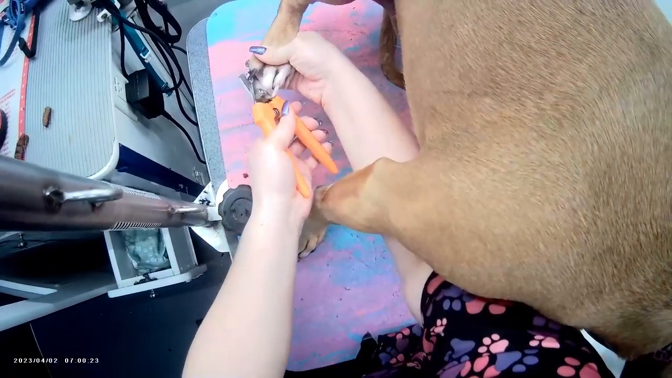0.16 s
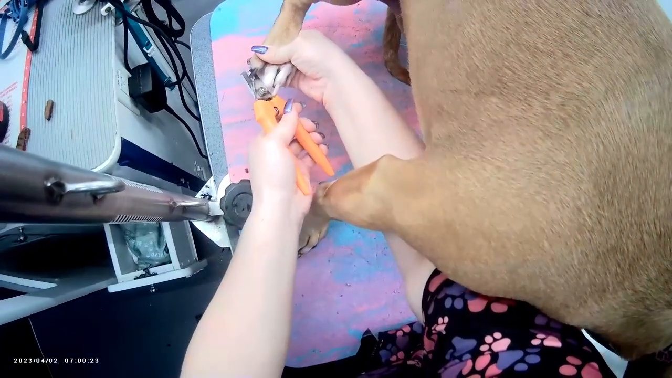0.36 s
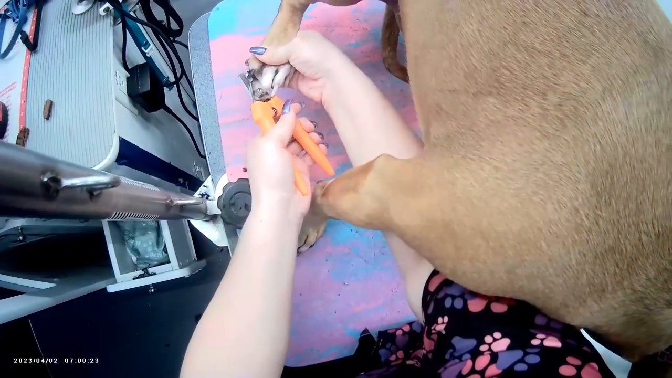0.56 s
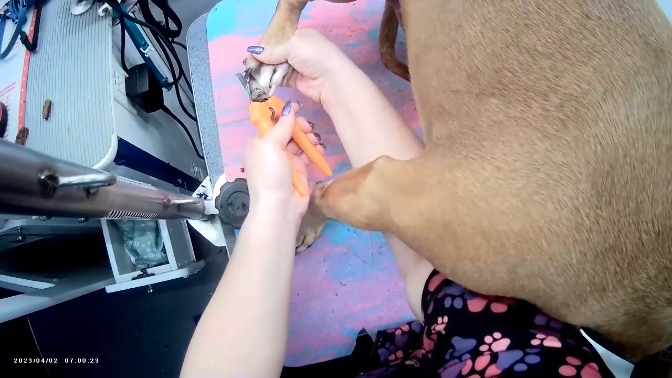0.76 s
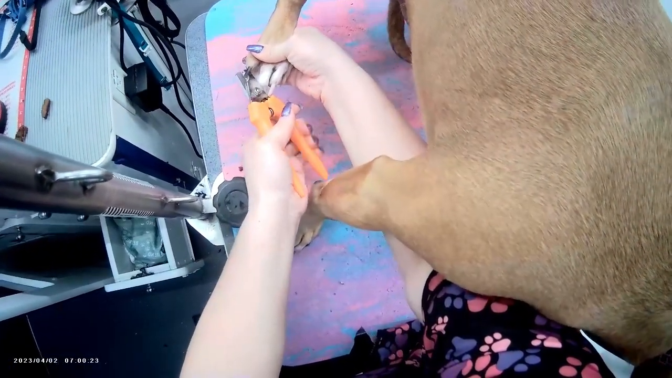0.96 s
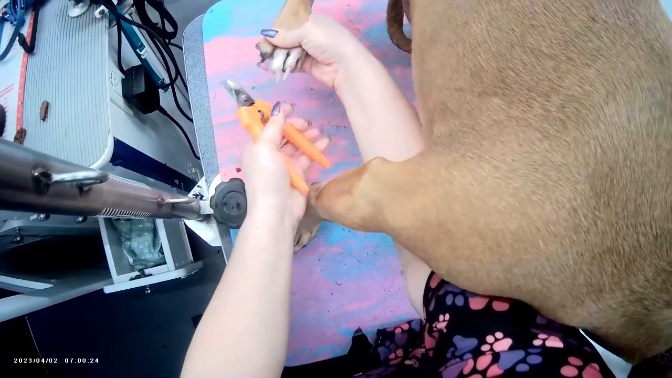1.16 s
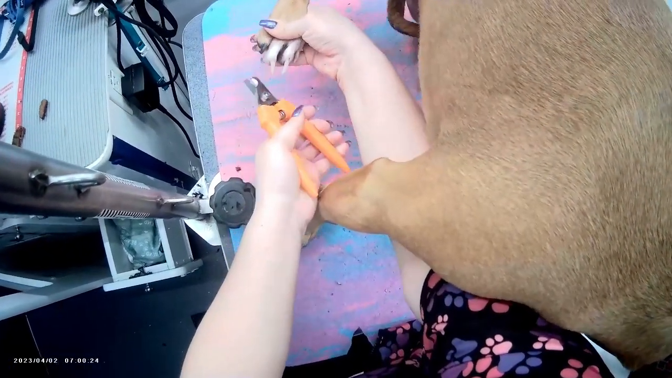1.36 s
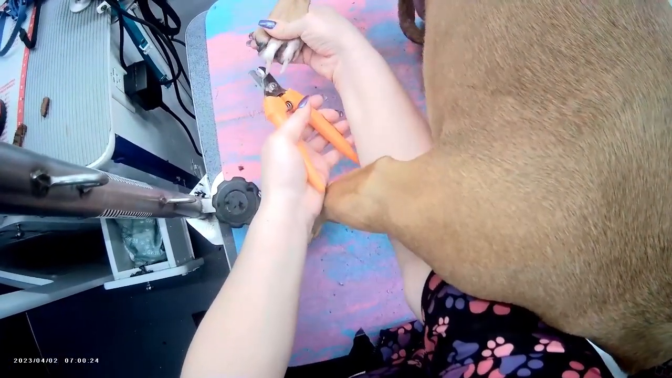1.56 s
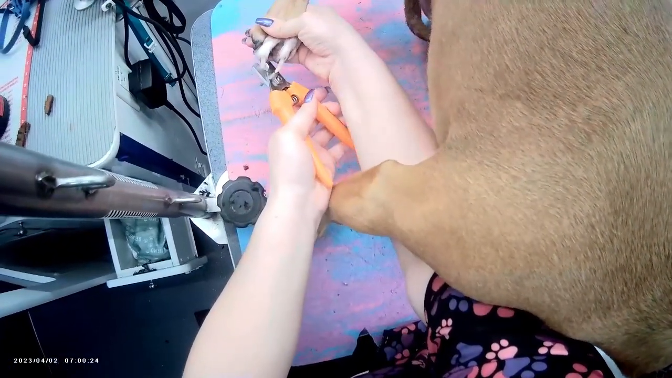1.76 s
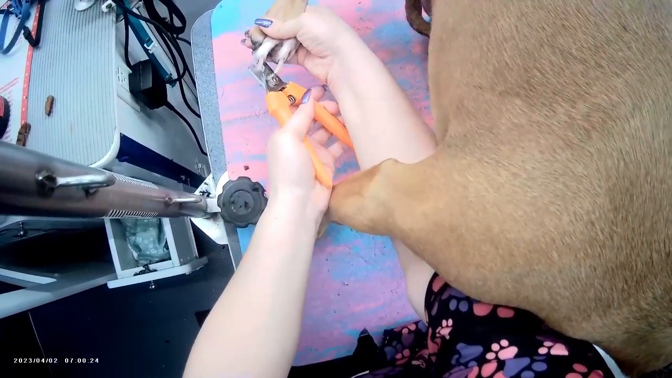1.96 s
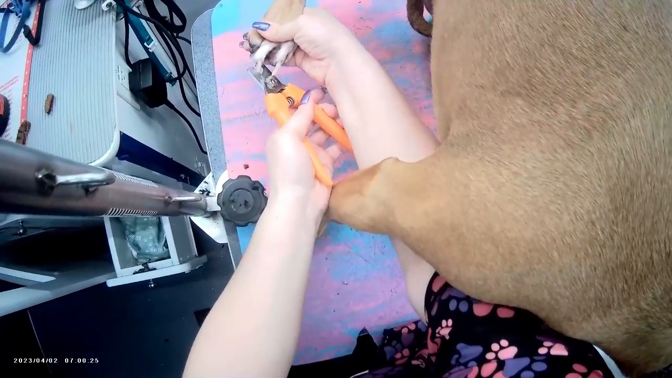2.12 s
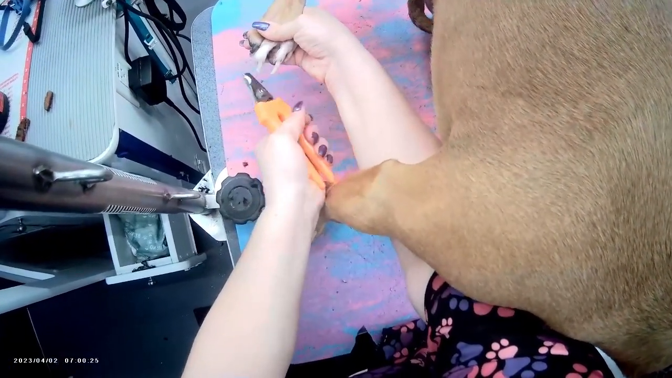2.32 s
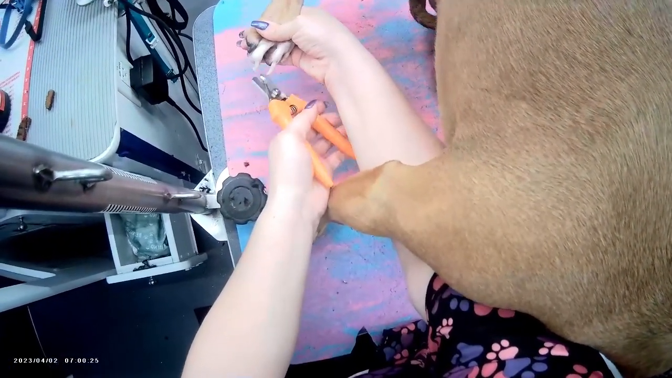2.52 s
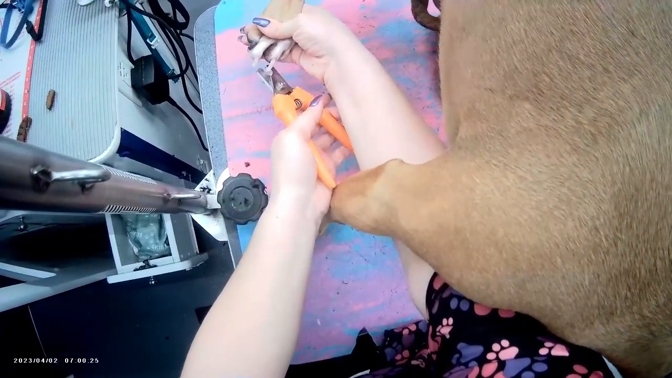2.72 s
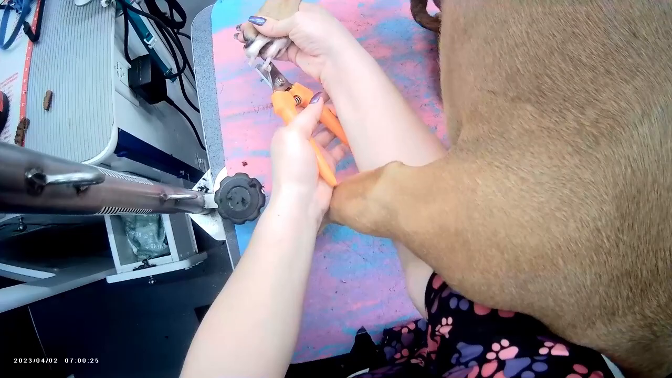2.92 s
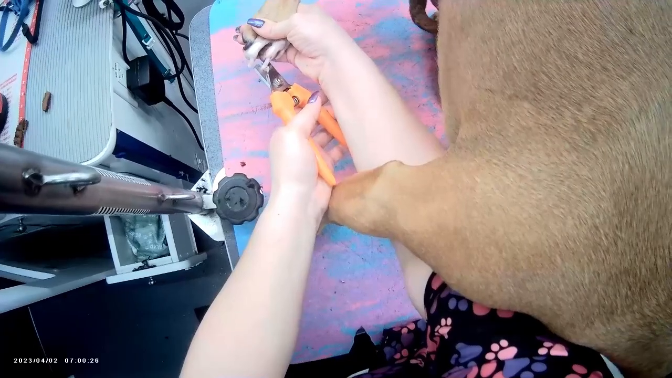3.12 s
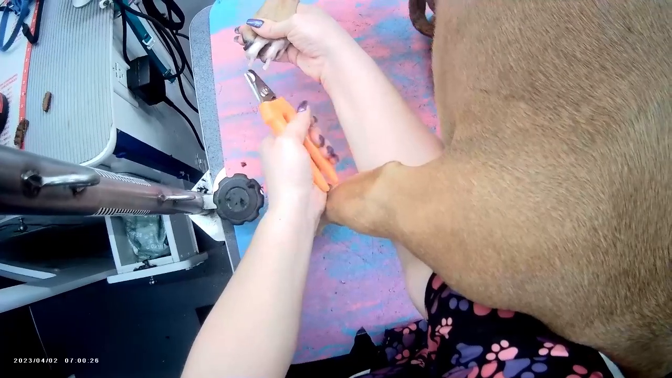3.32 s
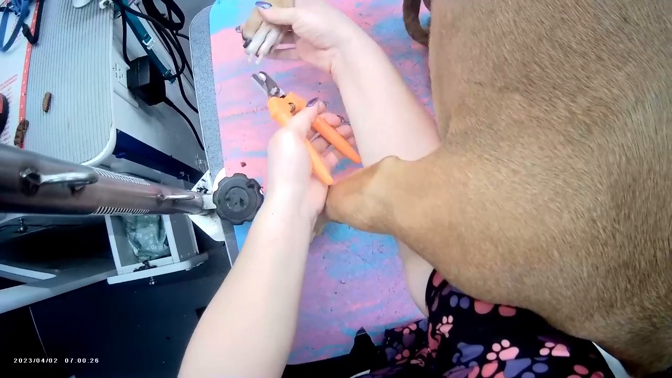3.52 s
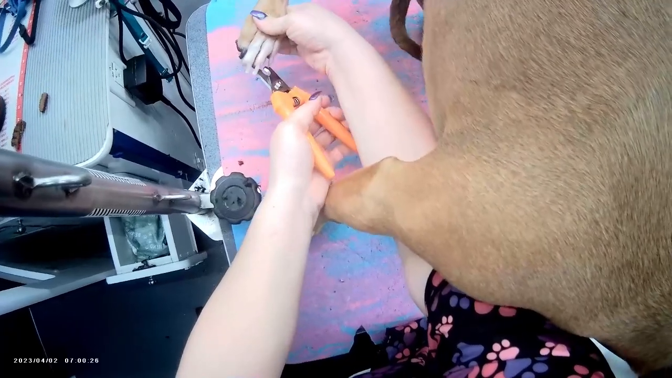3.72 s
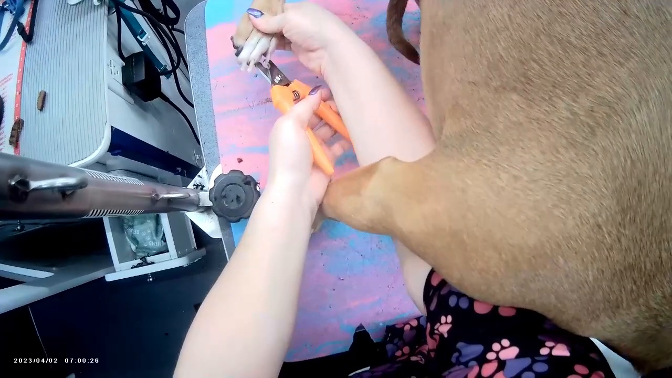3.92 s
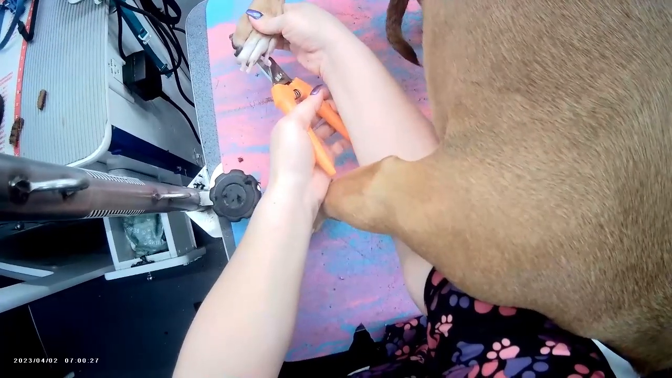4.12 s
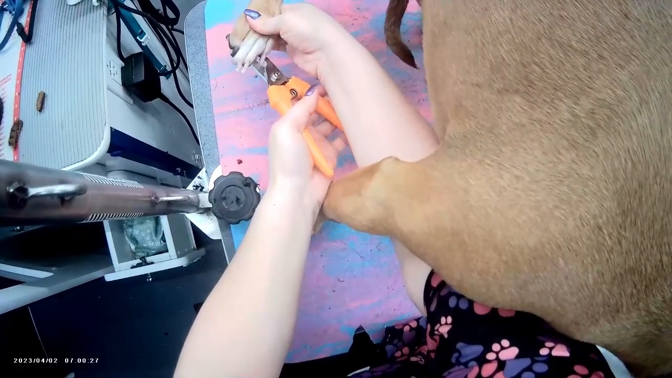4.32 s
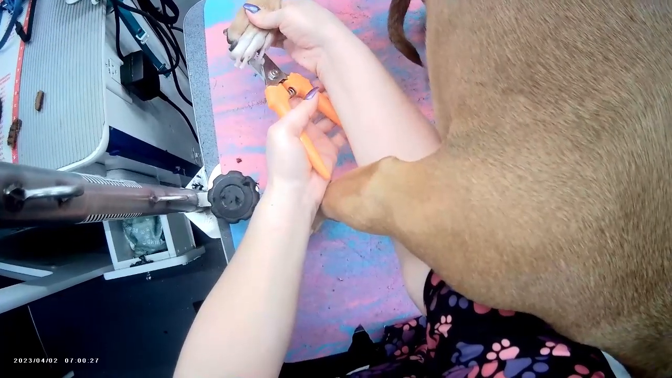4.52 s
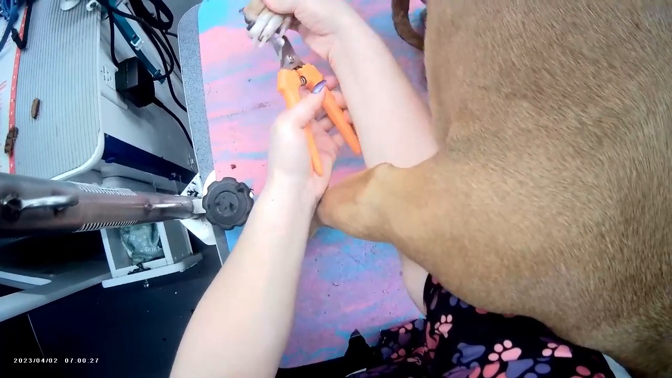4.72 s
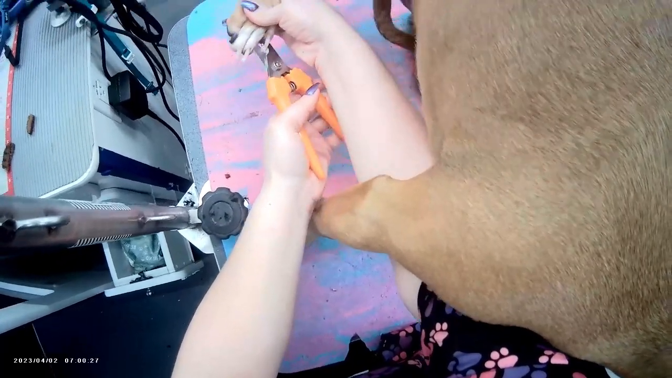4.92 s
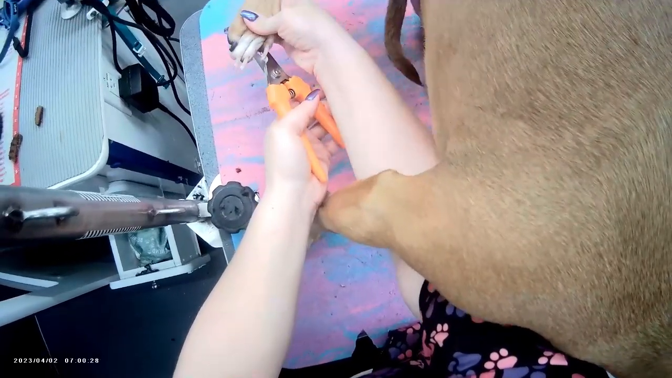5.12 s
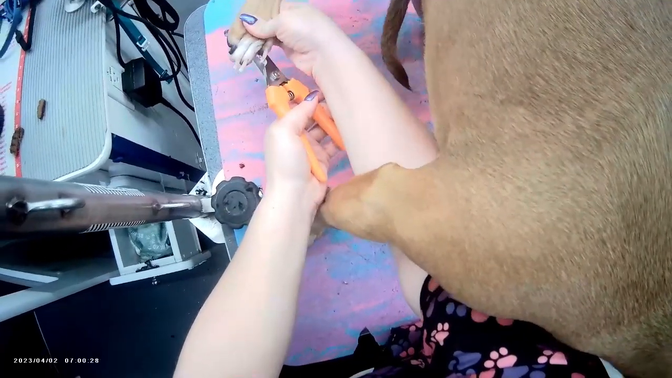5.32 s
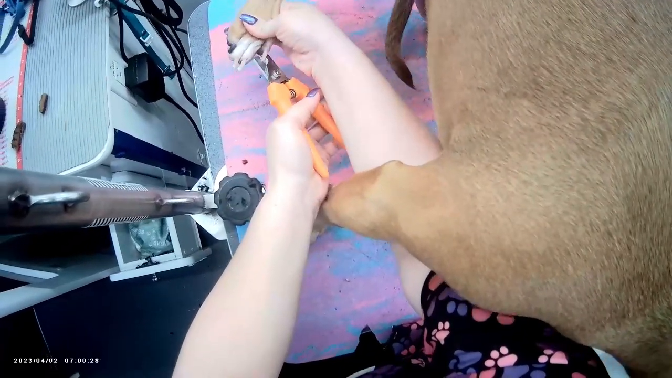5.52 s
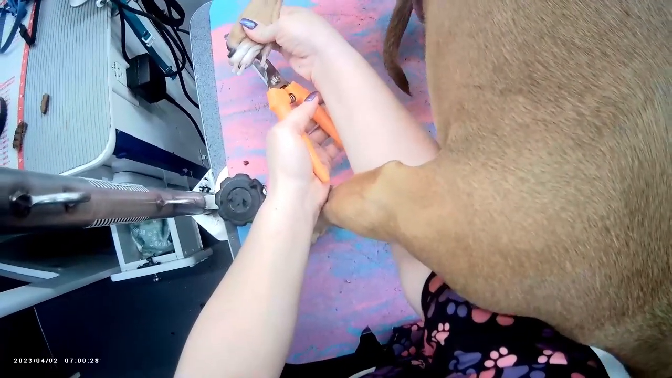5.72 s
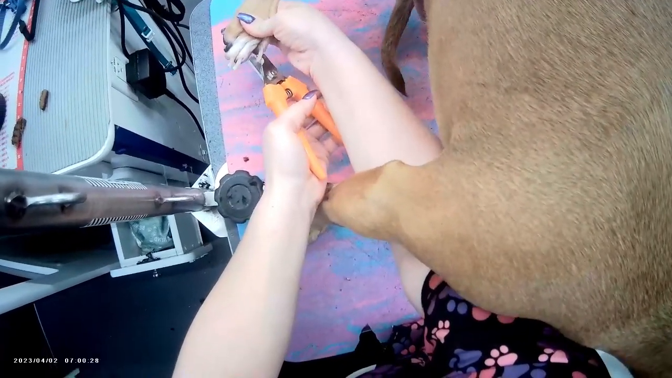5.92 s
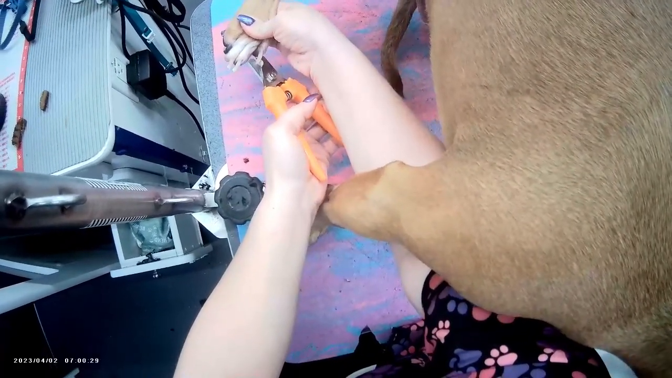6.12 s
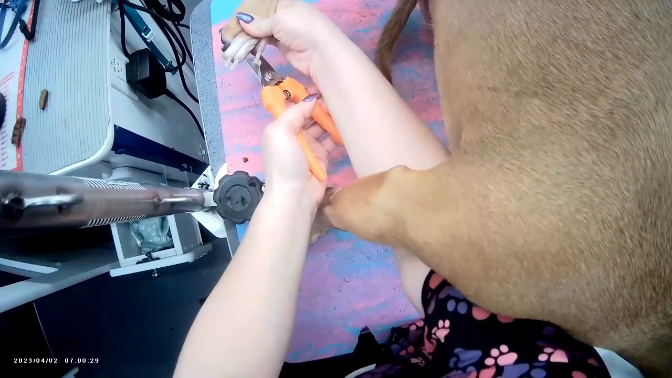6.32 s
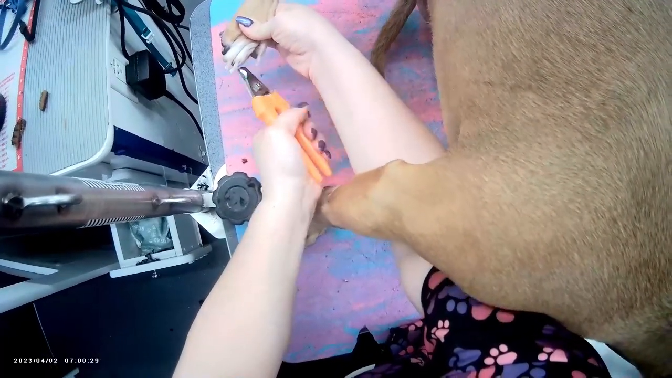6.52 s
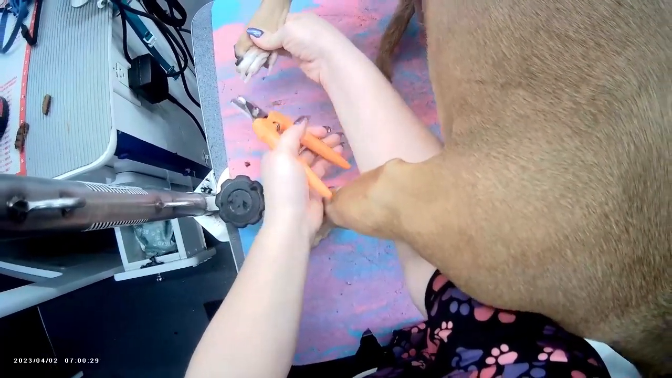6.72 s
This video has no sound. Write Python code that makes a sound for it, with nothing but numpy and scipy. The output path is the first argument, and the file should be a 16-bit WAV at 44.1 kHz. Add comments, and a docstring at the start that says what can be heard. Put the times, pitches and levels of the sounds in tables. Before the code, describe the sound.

Close, crackling snips of steel clippers on thick dog nails, each a snap with a tearing edge and an instant clack of jaws and plastic handles. Three cuts come in the first half and one near the end. Underneath runs an unbroken, boomy fan whir with a wavering hum, joined midway by a swelling low drone. The close microphone sounds narrow, with muffled highs and a short indoor tail.

```python
"""Fans rush and hum throughout: noise through hollow resonances, plus slightly wavering sines.
Scissor-style clippers then cut a dog's toenails four times, at about 1.0, 2.3, 3.3 and 6.6 s, close by
in a dry room. Creaks of the blades precede all but the first cut. Each cut is a splinter, a snap, a tear
and, some 6 ms after the snap, a clack of the jaws: dispersed impulses that ring steel, horn and handles.
Between the third and fourth cuts one low drone swells, then holds."""
import sys
import numpy as np
from scipy import signal
from scipy.fft import rfft, irfft, next_fast_len
from scipy.io import wavfile
from scipy.ndimage import uniform_filter1d, minimum_filter1d, map_coordinates

SR = 44100
rng = np.random.default_rng(int(sys.argv[2]) if len(sys.argv) > 2 else 0)


def transcribe(u):
    """Save the signal u as a 16-bit wav file named by the first command-line argument.

    u: samples, shape (n,) or (channels, n), limited to [-1, 1]; the rate is SR.
    q: integer samples, one column per channel.
    """
    v = np.clip(np.atleast_2d(u).T, -1, 1)
    q = np.round(v * 32767).astype(np.int16)
    wavfile.write(sys.argv[1], SR, q)


N = 302646
T = np.arange(N) / SR
SPAN = SR // 4  # samples in one short event

# Spectrum of the fan rush. Each row: frequency in Hz, gain in dB.
AIR_COLOUR = [(20, -1), (80, 0), (130, -1), (205, -12), (280, -10), (400, -12.5), (500, -14), (750, -16.5),
              (1300, -24.2), (1650, -29.5), (2250, -28.5), (2800, -32), (4000, -32), (5000, -36.5),
              (6500, -40), (9000, -41.5)]
# Hollows of the fan housings and the room. Each row: frequency in Hz, width in Hz, gain over the rush in dB.
HOUSING_MODES = [(138, 5, 9.5), (178, 9, 13.5), (261, 19, 13.0), (295, 8, 14.0), (337, 8, 10.5),
                 (377, 21, 10.5), (408, 20, 8.5), (472, 8, 5.5), (591, 57, -0.5), (664, 16, 5.0),
                 (801, 15, 3.5), (925, 9, 3.0), (972, 25, 6.5), (1109, 13, 9.0), (1197, 9, 11.0),
                 (1232, 19, 11.0), (1321, 15, 9.0), (1389, 41, 9.0), (1509, 34, 4.0), (1651, 39, 9.0),
                 (1746, 24, 8.5), (1855, 33, 5.5), (2000, 73, 4.5), (2150, 27, 4.5)]
AIR_DB = -26
FAN_HZ, BLOWER_HZ, MOTOR_HZ, MAINS_HZ = 24.205, 24.94, 58.3, 60.165
# Hum sources. Each row: base rate in Hz, list of (multiple of that rate, rms level in dB).
ROTORS = [(FAN_HZ, [(1, -62), (2, -27.5), (3, -38.5), (4, -46), (6, -42.5), (7, -51), (8, -41), (9, -44)]),
          (BLOWER_HZ, [(1, -20), (3, -45), (6, -40.5)]), (MOTOR_HZ, [(1, -31), (2, -33)]),
          (MAINS_HZ, [(2, -33), (4, -45)])]
DRONE_HZ, DRONE_DB, SWELL_DB, SWELL_START_S, SWELL_S = 92.46, -37, 11, 3.62, 1.96

# Reflections off near surfaces, table and arms. Each row: delay in seconds, level in dB.
ECHOES = [(.0012, -36), (.0041, -16.5), (.0074, -14.5), (0.017, -38)]
# Spectrum of the diffuse tail. Each row: frequency in Hz, gain in dB.
ROOM_COLOUR = [(200, -20), (700, 3), (1500, -1), (2200, -7.5), (2800, 0), (3700, 1), (4600, -1.5),
               (6300, -0.5), (7100, -0.5), (9000, 1.5)]
ROOM_DB, ROOM_T60_S = -6.5, 0.19

# Steel of the clippers, damped by the hand. Each row: frequency in Hz, level in dB, t60 in seconds.
CLIPPER_MODES = [(1940, -37, 0.14), (2440, -37, 0.066), (2720, -35.5, 0.033), (3400, -37.5, 0.04),
                 (3710, -38.5, 0.035), (3980, -30, .025), (4440, -39, .03), (4730, -35, 0.025),
                 (4900, -35, 0.025), (5330, -35, 0.025), (5450, -35.5, .025), (6500, -34.5, .025),
                 (6500, -25.5, 0.023), (6900, -33, .03), (7830, -31, .025)]
# Plastic handles. Each row: frequency in Hz, level in dB, t60 in seconds.
HANDLE_MODES = [(560, -3.5, 0.0043), (710, -20.5, 0.0033), (920, -14.5, 0.0095)]
# Spectrum of the directly heard crack. Each row: frequency in Hz, gain in dB.
CRACK_COLOUR = [(200, 13), (700, -4.5), (1400, -4.5), (2050, 5), (3050, -1), (3700, 3.5), (4300, 2),
                (4850, 3), (6500, 2.5), (8000, 1.5), (12000, -15.5)]
# Blades sticking and slipping as the grip tightens. Each row: start in seconds, relative level in dB,
# bite from 0 (skid) to 1 (tick).
SLIPS = [(2.231, -18.5, 0.2), (2.258, -9.5, 0.7), (3.221, -22, 0.6), (3.2255, -14.5, .1), (3.237, -15, 0.8),
         (3.2507, -12, 1), (3.2625, -20, 0.8), (6.5183, -17, 0.05)]
# Broad tick of a biting blade. Each row: frequency in Hz, width in Hz.
BITE_BANDS = [(3750, 2000), (6200, 1600)]
SKID_HZ, SKID_WIDTH_HZ = 4930, 620
SLIP_ROOM_DB, SLIP_WALL_S = 4, 0.003
# Cuts. Each row: snap time in seconds, snap level in dB, snap decay in seconds, snap high-pass in Hz,
# nail pitch in Hz, nail ring in dB, splinter lead in seconds, splinter level in dB, tear level in dB,
# tear pitch in Hz, tear ring in dB, jaw delay in seconds, clack level in dB, handle knock in dB,
# gain of the body band in dB, extra room in dB. Levels are relative.
SNIPS = [(1.0292, 3.5, 0.00039, 350, 2320, -8.5, .0012, -20, -5.5, 4100, -14, .0059, -4, -7.5, 2, 1),
         (2.2944, -5.5, 0.0022, 900, 3800, -3.5, 0.00119, -9, -0.5, 5000, -10, .0064, -4, -8, -1.5, 1.5),
         (3.2759, 3.5, 0.00049, 496, 3420, -3.5, 0.0027, -23, -0.5, 3480, -8, .006, -4.5, -11, 3, 1),
         (6.5589, 1, 0.00025, 300, 3540, -7, .0025, -5, 0.5, 3730, -6, .0062, -7, -9.5, -2.5, 1)]
SNIP_DB = 3.5
SPLINTER_DECAY_S, SPLINTER_HIGHPASS_HZ = 0.00055, 2500
TEAR_AFTER_S, TEAR_DECAY_S, TEAR_HIGHPASS_HZ = 0.0032, 0.00057, 2080
CLACK_DECAY_S, CLACK_HIGHPASS_HZ = 0.00046, 750
NAIL_WIDTH_HZ, NAIL_ROOM_DB = 320, -12
BODY_HZ, BODY_WIDTH_HZ = 2150, 1100

# Treble roll-off of the recorder. Each row: frequency in Hz, gain in dB.
RECORDER_COLOUR = [(6000, -0.5), (7000, -2), (7600, -8), (8200, -14.5), (8700, -26.5), (9200, -44.5),
                   (10000, -67)]
CUTOFF_HZ = 15700


def from_db(db):
    """Decibels to amplitude ratio."""
    return 10 ** (np.asarray(db) / 20)


def rms_one(x):
    """Scale to rms 1."""
    return x / np.sqrt(np.mean(x ** 2) + 1e-20)


def add(track, start_s, sound):
    """Mix a sound into a track in place."""
    part = track[round(start_s * SR):][:len(sound)]
    part += sound[:len(part)]


def colour(x, points):
    """Causal minimum-phase filter that follows a (Hz, dB) curve."""
    size = 2 * next_fast_len(len(x))
    hz, db = np.transpose(points)
    bins_hz = np.maximum(np.fft.rfftfreq(size, 1 / SR), 1)
    gain_db = np.interp(np.log(bins_hz), np.log(hz), db)
    cepstrum = irfft(np.log(from_db(gain_db)))
    # folding the cepstrum forward makes the phase minimal
    cepstrum[1:size // 2] *= 2
    cepstrum[size // 2 + 1:] = 0
    return irfft(rfft(x, size) * np.exp(rfft(cepstrum)))[:len(x)]


def resonance(x, hz, width_hz):
    """Two-pole band-pass with gain 1 on top."""
    r = np.exp(-np.pi * width_hz / SR)
    zeros = np.array([1, 0, -1]) * (1 - r * r) / 2
    poles = [1, -2 * r * np.cos(2 * np.pi * hz / SR), r * r]
    return signal.lfilter(zeros, poles, x)


def drift(rate_hz):
    """Smooth random curve with rate_hz knots a second, rms 1."""
    knots = rng.standard_normal(1024)
    return rms_one(map_coordinates(knots, [T * rate_hz], mode="wrap"))


def air(flutter_db=0.53):
    """Turbulence from the fans, with the hollow resonances of their housings."""
    rush = rng.standard_normal(N)
    for hz, width_hz, db in HOUSING_MODES:
        rush = rush + from_db(db) * resonance(rng.standard_normal(N), hz, width_hz)
    level = from_db(AIR_DB + flutter_db * drift(8))
    return level * rms_one(colour(rush, AIR_COLOUR))


def tone(hz, db, waver_db=1.6, sway_rad=0.11):
    """A sine that wavers slightly in level and phase; db is its rms level before the waver."""
    phase = 2 * np.pi * (hz * T + rng.random()) + sway_rad * drift(1.2)
    level = np.sqrt(2) * from_db(db + waver_db * drift(2.2))
    return level * np.sin(phase)


def hum():
    """Rotors at slightly different speeds beat against one another; the drone idles, swells and holds."""
    lines = sum(tone(k * hz, db) for hz, orders in ROTORS for k, db in orders)
    swell = np.clip((T - SWELL_START_S) / SWELL_S, 0, 1)
    return lines + tone(DRONE_HZ, DRONE_DB + SWELL_DB * swell)


def burst(decay_s, passes=3):
    """A dense volley of random-sign impulses that dies away, evened out to favour no pitch; energy 1."""
    fade = np.exp(-T[:SPAN] / decay_s)
    x = rng.standard_normal(SPAN) * fade
    for _ in range(passes):
        flat = irfft(np.exp(1j * np.angle(rfft(x))), SPAN)
        x = np.sign(flat) * fade
    return x / np.linalg.norm(x)


def room(x, extra_db=0, first_wall_s=0.006):
    """Near reflections, then a short diffuse tail, freshly drawn on each call."""
    response = np.zeros(SPAN)
    for delay_s, db in ECHOES:
        response[round(delay_s * SR)] += from_db(db)
    tail = colour(burst(ROOM_T60_S / np.log(1000)), ROOM_COLOUR)
    add(response, first_wall_s, from_db(ROOM_DB + extra_db) * tail)
    return x + signal.fftconvolve(x, response)[:len(x)]


def ring(force, hz, t60_s):
    """Damped mode: a unit click sets a sine of initial height 1 ringing."""
    r = from_db(-60 / (t60_s * SR))
    w = 2 * np.pi * hz / SR
    return signal.lfilter([0, np.sin(w)], [1, -2 * r * np.cos(w), r * r], force + 1e-18)


def crumble(decay_s, grit=0.83, count=7):
    """An impulse smeared by dispersion in the tool, plus the grit of splitting horn; flat, then faded."""
    force = signal.unit_impulse(SPAN) + 1e-18
    r = np.exp(-1 / (decay_s * SR))
    for hz in np.linspace(1500, 7500, count) + rng.uniform(-400, 400, count):
        poles = [1, -2 * r * np.cos(2 * np.pi * hz / SR), r * r]
        force = signal.lfilter(poles[::-1], poles, force)  # all-pass
    phase = np.angle(rfft(force + grit * burst(2 * decay_s)))
    return irfft(np.exp(1j * phase), SPAN) * np.exp(-T[:SPAN] / (20 * decay_s))


def creak(hz, width_hz, decay_s=0.00045, gain_db=10.0):
    """A short gritty scrape of the blade, focused around one pitch by two equal resonances."""
    scrape = crumble(decay_s, grit=0.71)
    focused = resonance(resonance(scrape, hz, width_hz), hz, width_hz)
    return from_db(gain_db) * focused


def slip(bite, skid_db=4.5):
    """The blade skids on the nail with a narrow chirp, or bites in with a broad tick."""
    bite = np.clip(bite, 0, 1)
    skid = from_db(skid_db) * creak(SKID_HZ, SKID_WIDTH_HZ)
    tick = sum(creak(hz, width_hz) for hz, width_hz in BITE_BANDS)
    return (1 - bite) * skid + bite * tick


def contact(decay_s, highpass_hz, crack_db=10.0):
    """A brief rough force is heard directly and rings the steel; a higher high-pass leaves less body."""
    highpass = signal.butter(1, highpass_hz, "high", fs=SR, output="sos")
    force = signal.sosfilt(highpass, crumble(decay_s))
    steel = sum(from_db(db) * ring(force, hz, t60_s) for hz, db, t60_s in CLIPPER_MODES)
    return from_db(crack_db) * colour(force, CRACK_COLOUR) + steel


def nail(decay_s, hz, width_hz=450, gain_db=25.0):
    """The horn of the nail rings for a few cycles only."""
    return from_db(gain_db) * resonance(crumble(decay_s), hz, width_hz)


def fracture(decay_s, highpass_hz, hz, ring_db, room_db):
    """Horn gives way: the jolt of the blades fills the room, the brief ring of the nail stays close."""
    horn = from_db(ring_db) * nail(decay_s, hz, NAIL_WIDTH_HZ)
    return room(contact(decay_s, highpass_hz), room_db) + room(horn, NAIL_ROOM_DB)


def handle_knock():
    """A click rings the plastic handles."""
    click = signal.unit_impulse(SPAN)
    return sum(from_db(db) * ring(click, hz, t60_s) for hz, db, t60_s in HANDLE_MODES)


def clippers():
    """The nail creaks and gives way in three steps; then the jaws meet and knock the handles."""
    out = np.zeros(N)
    knock = handle_knock()
    for (snap_s, snap_db, decay_s, highpass_hz, nail_hz, ring_db, lead_s, splinter_db,
         tear_db, tear_hz, tear_ring_db, shut_s, clack_db, knock_db, body_db, room_db) in SNIPS:
        splinter = from_db(splinter_db) * room(contact(SPLINTER_DECAY_S, SPLINTER_HIGHPASS_HZ), room_db)
        snap = from_db(snap_db) * fracture(decay_s, highpass_hz, nail_hz, ring_db, room_db)
        tear = fracture(TEAR_DECAY_S, TEAR_HIGHPASS_HZ, tear_hz, tear_ring_db, room_db)
        tear = from_db(tear_db) * tear
        jaws = from_db(clack_db) * contact(CLACK_DECAY_S, CLACK_HIGHPASS_HZ)
        clack = room(jaws + from_db(knock_db) * knock, room_db)
        steps = ((-lead_s, splinter), (0, snap), (TEAR_AFTER_S, tear), (shut_s, clack))
        for after_s, step in steps:
            body = (from_db(body_db) - 1) * resonance(step, BODY_HZ, BODY_WIDTH_HZ)
            add(out, snap_s + after_s, step + body)
    for start_s, db, bite in SLIPS:
        add(out, start_s, from_db(db) * room(slip(bite), SLIP_ROOM_DB, SLIP_WALL_S))
    return from_db(SNIP_DB) * out


def scene():
    """Fan rush, hum and clippers, as one channel."""
    return (air() + hum() + clippers())[None]


def limit(x, ceiling, size=45):
    """A fast limiter holds down the peaks; its gain glides, so the sharpest ones slip through."""
    gain = minimum_filter1d(ceiling / np.maximum(np.abs(x), ceiling), size)
    return x * uniform_filter1d(uniform_filter1d(gain, size), size)


def record(dry):
    """Narrow-band recorder: treble rolls off near 8 kHz, peaks are limited and the highest clipped."""
    limited = limit(colour(dry[0], RECORDER_COLOUR), 0.69)
    held = np.clip(limited, -0.72, 0.72)
    lowpass = signal.cheby2(12, 60, CUTOFF_HZ, fs=SR, output="sos")
    return signal.sosfilt(lowpass, held)[None]


dry = scene()
out = record(dry)
transcribe(out)
```